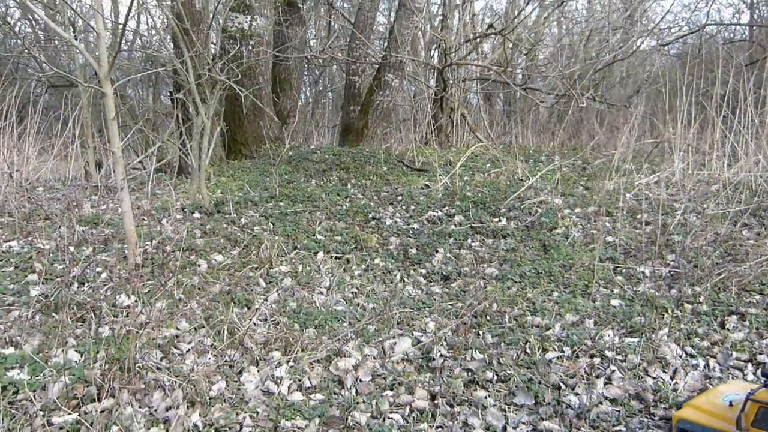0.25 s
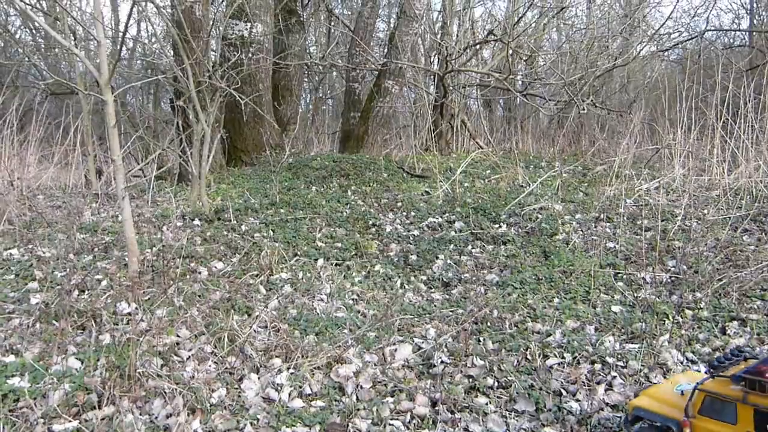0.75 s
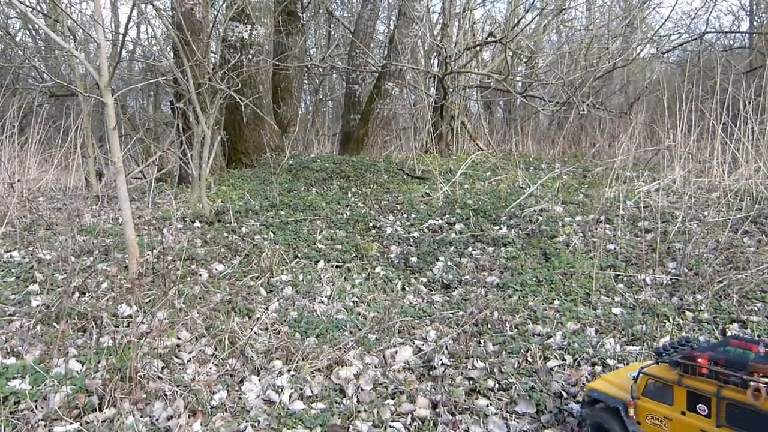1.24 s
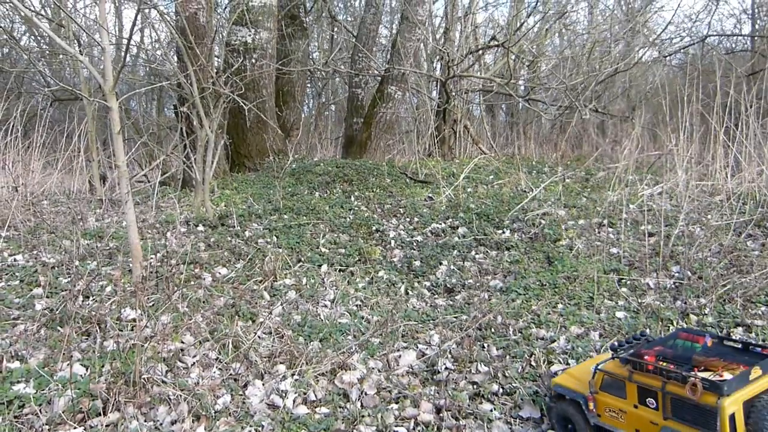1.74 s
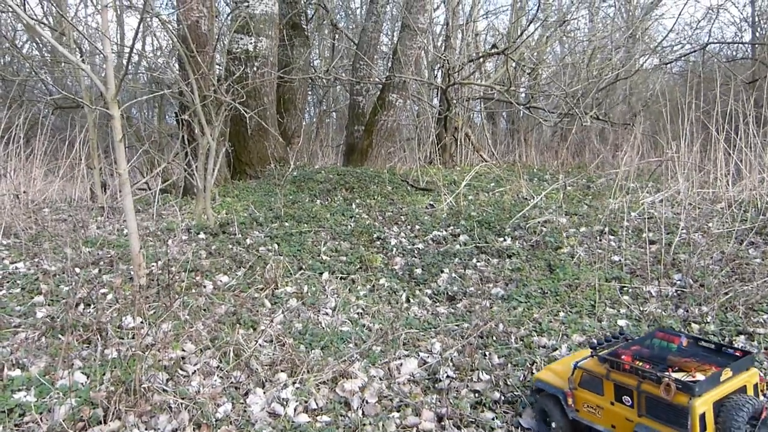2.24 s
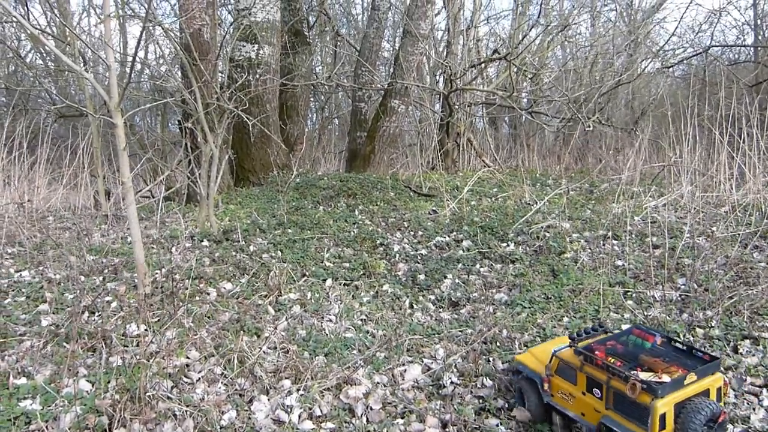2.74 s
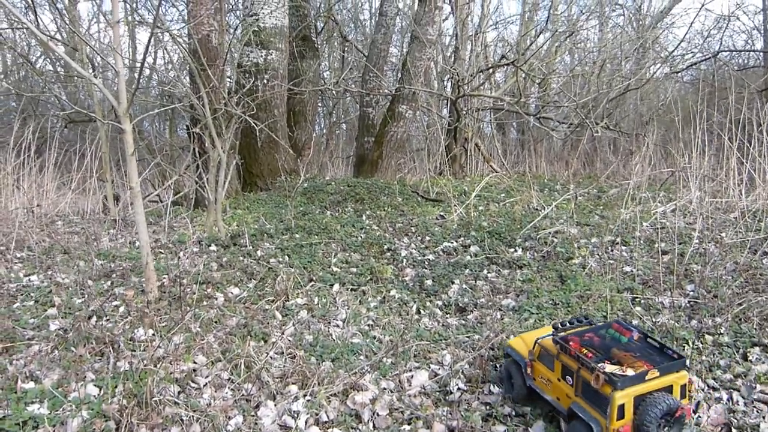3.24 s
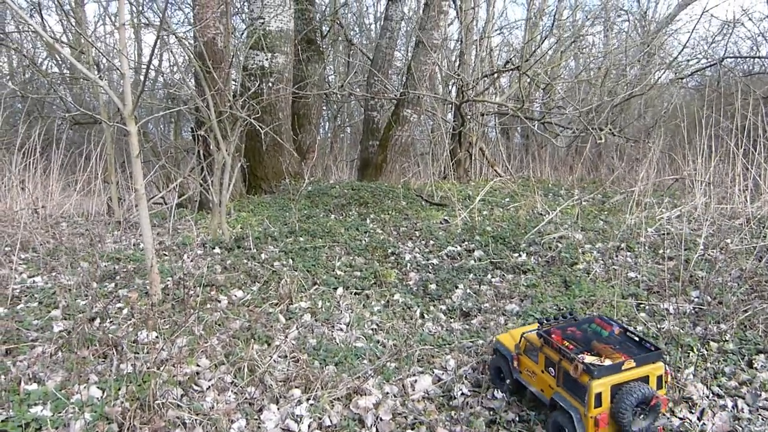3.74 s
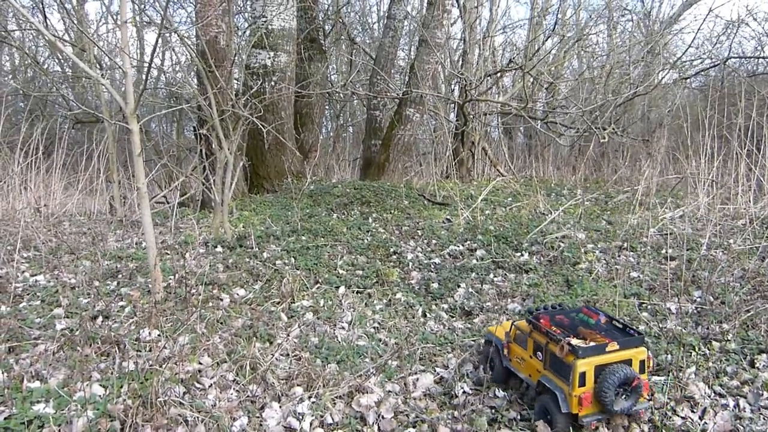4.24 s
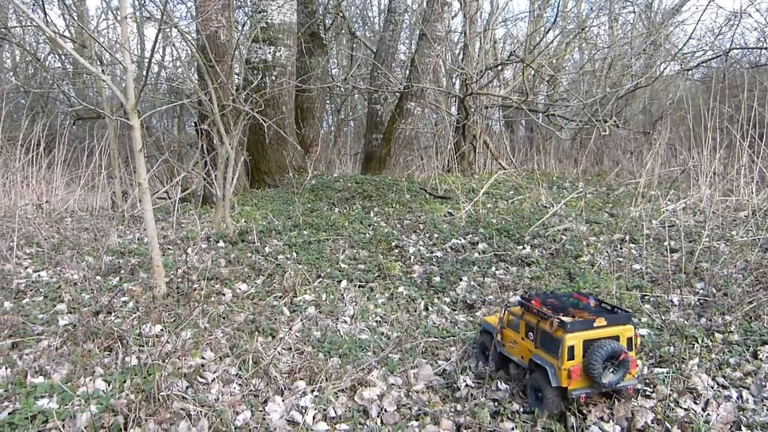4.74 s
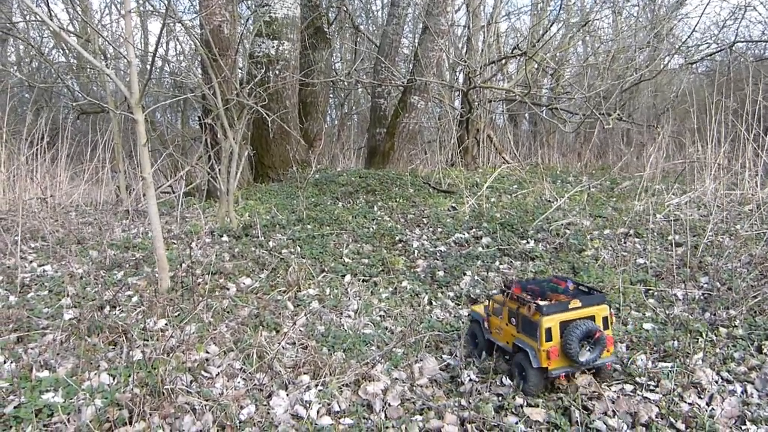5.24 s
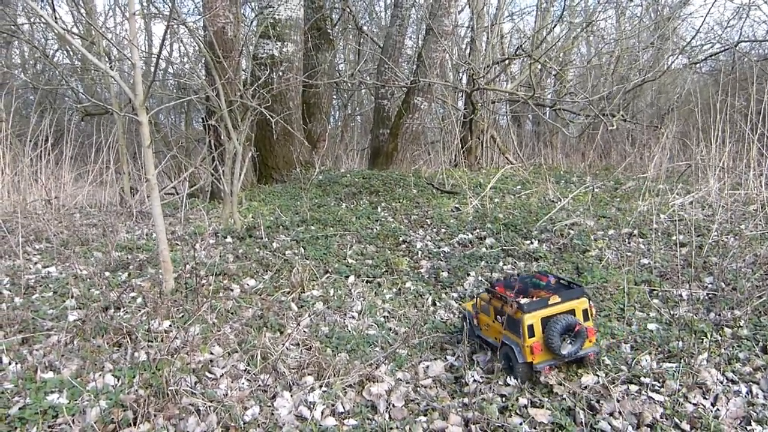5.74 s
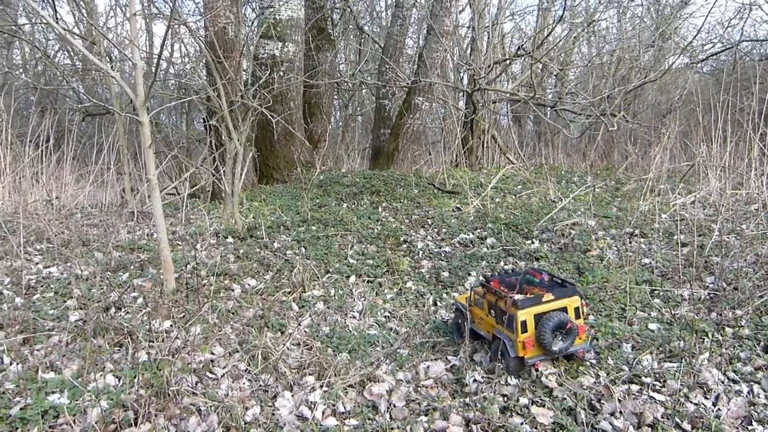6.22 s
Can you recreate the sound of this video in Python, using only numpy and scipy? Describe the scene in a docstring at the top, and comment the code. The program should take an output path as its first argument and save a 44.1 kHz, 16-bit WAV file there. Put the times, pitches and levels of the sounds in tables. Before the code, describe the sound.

From the start, the tyres of a small radio-controlled truck crush dry woodland leaves into a dense, bright crackle, dotted with sharp single snaps of leaves and twigs. Its plastic gears whirr softly and unevenly underneath, and the body shell gives two short hollow knocks in the first half second and another at about 3 seconds. A duller crunch of deeper litter swells in by 1 second and stays. The loudest twigs crack, with a woody ring, at around 3 seconds and again from 4 to 4.5 seconds. Wind touches the microphone lightly at first, then buffets it in low, thumping gusts from about 4.2 to 5.7 seconds before easing. The whirr gradually fades as the truck moves away, while the crackling carries on to the end at about 6.5 seconds. The sound is close and outdoors, with almost no echo.

```python
"""A small radio-controlled truck crawls away over dry woodland leaves, gears whirring, shell knocking.
From the start its tyres crush the litter into a dense crackle with single snaps of leaves and twigs;
a duller crunch swells by 1 s. The loudest twigs crack from 3 to 4.5 s. As the truck moves off, the
whirr fades and the ground reflection's notches climb through the crackle. Gusts, light at first,
buffet the microphone hardest from 4.2 to 5.7 s."""
import sys
import numpy as np
from scipy import signal
from scipy.fft import rfft, irfft
from scipy.io import wavfile
from scipy.ndimage import uniform_filter1d, map_coordinates

SR = 44100
rng = np.random.default_rng(int(sys.argv[2]) if len(sys.argv) > 2 else 0)


def dump_mix(stems):
    """Bounce the given channels to the path in sys.argv[1] as a 16-bit WAV at rate SR."""
    frames = np.atleast_2d(stems).T  # one column per channel
    limited = np.clip(frames, -1, 1)  # hard clip at full scale
    pcm = np.round(limited * 32767).astype(np.int16)
    wavfile.write(sys.argv[1], SR, pcm)


N = 285414
TIME = np.arange(N) / SR

# dry top leaves: freq_hz, gain_db
LEAF_SPECTRUM = [(300, -28), (1200, -18), (3900, -33), (4500, -4.5), (5300, -2.5), (6100, -1.5),
                 (6900, 4.5), (8000, 4.5), (9200, -1), (10500, -7), (12000, -8), (15500, -17.5)]
# deeper litter: freq_hz, gain_db
LITTER_SPECTRUM = [(100, -43), (600, -3.5), (1100, -8.5), (1700, -8), (2700, -1.5), (4000, 0.5), (4600, -7),
                   (7000, -12), (12000, -30)]

def tyres():
    """The tread folds leaves in clumps: bright crackle on top, dull crunch below, ticks of dry stalks."""
    crackle_db, crunch_db = crushing()
    clumps = flutter(rate_hz=81)
    top = fractures(1.98 * clumps, per_s=4500, spread_db=2.0, span_hz=(5200, 10700), width_hz=600,
                    direct=0.18, pan_spread=0.22)
    deep = fractures(2.05 * clumps, per_s=2800, spread_db=2.0, span_hz=(1397, 3970), width_hz=390,
                     direct=0.13, pan_spread=0.11)
    stalks = fractures(clumps, per_s=110, spread_db=2.2, span_hz=(1900, 9000), width_hz=500,
                       direct=0.25, pan_spread=0.3, modes=8)
    crackle = gain_of(crackle_db - 1.64) * steadied(colour(top, LEAF_SPECTRUM))
    crunch = gain_of(crunch_db - 1.0) * steadied(colour(deep, LITTER_SPECTRUM))
    ticks = unit_rms(colour(stalks, LEAF_SPECTRUM) + .5 * colour(stalks, LITTER_SPECTRUM))
    return crackle + crunch + gain_of(crackle_db - 9.5) * ticks


# steady rolling: time_s, crackle_db, crunch_offset_db
ROLLING = [(0, -35.5, -25), (.35, -37.5, -17), (.57, -40, -12), (1.08, -36, -2), (1.55, -35, -2),
           (2.35, -35.5, -4.5), (3.15, -35.5, -4.5), (3.85, -33, -4), (4.7, -36.5, -5.5),
           (4.97, -32.5, -3.5), (5.25, -34, -4), (6.2, -36, -4), (6.47, -35, 1)]
# leaf heaps under a tyre: start_s, length_s, crackle_db, crunch_offset_db
HEAPS = [(0.03, 0.19, -42.5, -7), (0.635, 0.071, -36.5, -6), (0.865, 0.086, -35.5, -5),
         (1.125, 0.33, -33.5, -5), (1.78, 0.13, -37.5, -5), (2.442, 0.2, -34, -2),
         (2.583, 0.27, -31.5, -4.5), (2.972, 0.12, -35, -3), (3.203, 0.14, -31, -4), (3.355, 0.29, -39, 2),
         (3.466, 0.18, -33, -3.5), (4.11, 0.045, -26, -4), (4.297, 0.13, -33, -3.5),
         (4.46, 0.14, -34.5, -2), (4.887, 0.2, -35.5, -3.5), (5.322, 0.23, -39, 0), (5.524, 0.036, -27, -6),
         (6.237, 0.071, -35.5, -6.5), (6.378, 0.13, -31, -3)]

def crushing(rise_s=0.012, settle_s=0.031):
    """Crackle and crunch envelopes in dB: each heap gives way, crackles under the tyre and settles."""
    rolling_db, offset_db = curves(ROLLING)
    power = gain_of([rolling_db, rolling_db + offset_db]) ** 2
    for start_s, length_s, heap_db, heap_offset_db in HEAPS:
        rise = np.clip((TIME - start_s) / rise_s, 0, 1)
        settle = np.exp(-np.maximum(TIME - start_s - length_s, 0) / settle_s)
        power += (gain_of([[heap_db], [heap_db + heap_offset_db]]) * rise * settle) ** 2
    return 10 * np.log10(power)


def fractures(clumps_db, per_s, spread_db, span_hz, width_hz, direct, pan_spread, modes=12):
    """Tiny breaks, mostly small, a few large; each lies left or right and rings one of many leaves."""
    strength = gain_of(spread_db * np.minimum(rng.exponential(1, N), 4) + clumps_db)
    clicks = strength * rng.choice([-1, 1], N) * (rng.random(N) < per_s / SR)
    pan = pan_spread * rng.standard_normal(N)
    clicks = clicks * np.array([1 + pan, 1 - pan])
    leaf = rng.integers(0, modes, N)
    pitches_hz = np.geomspace(*span_hz, modes)
    rings = sum(ring(clicks * (leaf == k), hz, width_hz) for k, hz in enumerate(pitches_hz))
    return rings + direct * clicks


# snapping leaves: start_s, crack_db, pitch_hz, decay_s
LEAF_SNAPS = [(0.1825, -18.5, 7900, 0.0033), (0.3966, -21.5, 8060, 0.0026), (0.44, -22.5, 6500, 0.002),
              (0.4575, -30, 6600, .0007), (0.5156, -20.5, 7200, 0.0008), (0.534, -23, 7600, .0005),
              (0.5604, -27, 6300, .0005), (0.5836, -22.5, 6400, 0.00045), (0.726, -24, 7200, .0005),
              (0.756, -19.5, 7350, 0.0057), (0.829, -20.5, 6350, 0.0055), (0.88, -27, 6800, .0015),
              (0.8977, -20, 5700, .001), (0.955, -24, 7300, 0.0016), (1.001, -21.5, 6750, 0.0011),
              (1.1664, -18, 5700, 0.00058), (1.2169, -16, 8700, 0.0033), (1.2237, -13, 6700, 0.00076),
              (1.2657, -18.5, 7900, 0.0024), (1.3, -21, 7900, .001), (1.4682, -16, 6840, 0.001),
              (1.5774, -19.5, 7000, 0.0069), (1.5886, -21, 6400, 0.00053), (1.8764, -27, 7500, .001),
              (1.928, -25.5, 7500, .0008), (2.0418, -20.5, 8300, 0.0024), (2.3353, -25.5, 8140, .0004),
              (2.4491, -19.5, 7160, 0.005), (2.4675, -29, 7500, .0005), (2.6806, -15.5, 8350, 0.0012),
              (2.7833, -13, 6740, 0.00087), (2.8228, -18.5, 5660, 0.002), (2.874, -17.5, 8200, 0.0012),
              (2.8866, -17, 7770, 0.0011), (2.9587, -21.5, 8750, 0.00049), (3.065, -18.5, 8700, 0.00073),
              (3.105, -17.5, 7600, 0.0022), (3.1144, -14.5, 8650, 0.00052), (3.219, -22, 8000, .002),
              (3.2499, -17, 7140, 0.00082), (3.2786, -15, 7800, 0.00051), (3.6363, -17.5, 7200, 0.00092),
              (3.9497, -16.5, 5950, 0.0009), (4.149, -19, 8500, .0025), (4.3306, -19, 9200, .0006),
              (4.3936, -18, 7950, .0005), (4.468, -16.5, 7300, 0.0016), (4.5018, -19, 7900, .0006),
              (4.562, -18, 7140, 0.00027), (4.7286, -25, 8000, .0005), (4.8933, -21.5, 8200, .0006),
              (5.0675, -17.5, 5900, 0.00065), (5.131, -19, 8000, .0004), (5.1598, -19, 8000, .0005),
              (5.4802, -20.5, 8400, 0.0058), (5.839, -19, 7140, 0.0021), (5.9854, -23.5, 8900, .0008)]

def leaves():
    """Dry leaves crack brightly; louder or longer breaks knock harder on the litter below."""
    out = np.zeros(N)
    for start_s, crack_db, pitch_hz, decay_s in LEAF_SNAPS:
        weight_db = 2.3 * (crack_db + 17) + 6.5 * np.log2(decay_s / .001)  # zero at -17 dB, 1 ms
        knock_db = crack_db - 15.5 + weight_db
        add(out, start_s, snap(crack_db, knock_db, pitch_hz, decay_s, ringing=1.5, width_hz=570))
    return out


# cracking twigs: start_s, knock_db, crack_db, pitch_hz, decay_s
TWIG_CRACKS = [(0.3446, -26.5, -24, 2430, 0.0012), (0.3595, -26.5, -26, 1650, 0.0011),
               (0.7124, -23.5, -21, 3000, 0.0011), (1.042, -22.5, -35, 2820, 0.00051),
               (1.154, -22, -30, 1970, 0.00092), (1.172, -21, -19, 1590, 0.0013),
               (1.3955, -21.5, -26, 2840, 0.004), (1.711, -28, -35, 2670, .001),
               (1.954, -23.5, -24, 2290, 0.0014), (2.181, -23.5, -22.5, 3600, 0.0024),
               (2.7842, -18, -20, 4840, 0.0019), (2.9959, -10.5, -21, 3100, 0.0016),
               (3.115, -16.5, -13, 1780, 0.0019), (3.2372, -19, -35, 3300, 0.0028),
               (4.101, -17, -17, 3020, 0.0019), (4.2198, -13.5, -14, 3600, 0.0027),
               (4.5223, -13.5, -17, 2480, 0.0022), (4.5281, -14.5, -12, 2550, .0038)]

def twigs():
    """Twigs break with a ringing, woody knock and bright splintering."""
    out = np.zeros(N)
    for start_s, knock_db, crack_db, pitch_hz, decay_s in TWIG_CRACKS:
        add(out, start_s, snap(crack_db, knock_db, pitch_hz, decay_s, ringing=4.2, width_hz=680))
    return out


def snap(crack_db, knock_db, pitch_hz, decay_s, ringing, width_hz, size=1024):
    """A first crack, then a run of smaller ones that swells and dies, ringing the leaf or twig."""
    age = np.arange(size) / SR / decay_s
    tear = rng.standard_normal(size) * (1 - np.exp(-age / .18)) * np.exp(-age)
    tear[0] += 3.2  # first crack
    tear += ringing * ring(tear, pitch_hz, width_hz)
    crack = butterworth(colour(tear, LEAF_SPECTRUM), 2, [4900, 11000], "band")
    knock = butterworth(colour(tear, LITTER_SPECTRUM), 2, [1150, 4100], "band")
    return burst(crack, crack_db) + burst(knock, knock_db)


# receding truck: time_s, first_notch_hz, whirr_db
ROUTE = [(0, 2920, -40), (.8, 3320, -41.5), (1.5, 3400, -42.5), (2.5, 4200, -42.5), (3.5, 4360, -44),
         (4.5, 5200, -45.5), (5.5, 4660, -47.5), (6.47, 5100, -49.5)]
# gear whirr: freq_hz, gain_db
GEAR_SPECTRUM = [(45, -35), (110, -15), (200, -3), (310, -4), (480, -0.5), (720, 0.5), (1050, -3),
                 (2000, -1.5), (5000, -8), (15000, -26)]

def gears(rough_db=1.5, hiss_hz=4100, width_hz=220, hiss_db=-14.0):
    """Plastic gears and shafts whirr softly, unevenly. A faint, narrow hiss band fades with the whirr."""
    _, whirr_db = curves(ROUTE)
    noise = rng.standard_normal(N) * gain_of(rough_db * flutter(rate_hz=96))
    whirr = unit_rms(colour(noise, GEAR_SPECTRUM))
    hiss = unit_rms(ring(ring(noise, hiss_hz, width_hz), hiss_hz, width_hz))
    return gain_of(whirr_db) * (whirr + gain_of(hiss_db) * hiss)


# jolts over bumps: start_s, level_db, pitch_hz
SHELL_KNOCKS = [(0.187, -29, 726), (0.281, -29.5, 640), (3.017, -29, 850)]

def shell(width_hz=260, decay_s=0.0018, size=2048):
    """Each jolt rattles the plastic body shell: a short, hollow knock."""
    out, t = np.zeros(N), np.arange(size) / SR
    for start_s, level_db, pitch_hz in SHELL_KNOCKS:
        rattle = rng.standard_normal(size) * np.exp(-t / decay_s)
        add(out, start_s, burst(ring(rattle, pitch_hz, width_hz), level_db))
    return out


# eddies at the microphone: freq_hz, gain_db
WIND_SPECTRUM = [(25, -30), (50, -25), (90, -10), (140, -1.5), (220, -1), (320, -3.5), (500, -3.5),
                 (680, -9.5), (1000, -20), (1500, -33), (4000, -52)]

def wind(lumpy_db=4, trim_db=-17, bright_db_per_db=0.7):
    """Eddies push the two microphone ports mostly in opposite directions; harder gusts are brighter."""
    force_db = gusts() + 21  # near 0 in the strongest gusts
    lumps = gain_of(lumpy_db * np.tanh(flutter(rate_hz=41) / 2))
    eddies = colour(lumps * rng.standard_normal((2, N)), WIND_SPECTRUM)
    lows = butterworth(eddies, 1, 350, "low")
    opposed, common = lows + gain_of(bright_db_per_db * force_db) * (eddies - lows)
    buffet = gain_of(force_db) * steadied(butterworth(opposed, 2, 90, "high"))
    # the deepest part reaches both ports alike
    deep = butterworth(common, 1, 55, "low") + 0.74 * gain_of(force_db / 2) * common
    thump = gain_of(0.73 * force_db - 21) * steadied(deep)
    return gain_of(trim_db) * np.array([thump + buffet, thump - buffet])


# gusts: peak_s, length_s, force_db
GUSTS = [(0.536, 0.09, -37.5), (0.832, 0.11, -36), (1.318, 0.26, -38.5), (1.537, 0.033, -34),
         (1.65, 0.15, -37), (1.995, 0.14, -37), (2.103, 0.067, -35.5), (2.562, 0.091, -42),
         (3.108, 0.2, -41.5), (4.245, 0.046, -26.5), (4.665, 0.072, -18), (4.777, 0.089, -21.5),
         (4.93, 0.43, -21), (5.097, 0.025, -24.5), (5.228, 0.12, -28.5), (5.419, .025, -26),
         (5.538, 0.16, -20.5), (6.024, 0.11, -31), (6.27, 0.075, -33.5), (6.463, 0.049, -28.5)]
# breeze between gusts: time_s, force_db
BREEZE = [(0, -89), (.65, -47.5), (1.45, -56), (2.3, -61), (3.85, -65), (4.25, -36), (5.4, -35),
          (6.47, -47.5)]

def gusts():
    """Wind force in dB: each gust swells and dies as a bell curve on top of the breeze."""
    power = gain_of(curves(BREEZE)[0]) ** 2
    for peak_s, length_s, force_db in GUSTS:
        from_peak = np.minimum(abs(2 * (TIME - peak_s) / length_s), 10)
        power += gain_of(force_db) ** 2 * np.exp(-2 * from_peak ** 2)
    return 10 * np.log10(power)


def ground(x, echo=0.28, band_hz=5400, width_hz=1300, near_db=4.5, sink_db=-7):
    """The bounce lags less as the truck moves off, so its notches climb; the lower treble sinks."""
    first_notch_hz, _ = curves(ROUTE)
    lag_samples = SR / (2 * first_notch_hz)
    bounce = map_coordinates(x, [np.arange(N) - lag_samples], order=3)
    x = (x + echo * bounce) / np.sqrt(1 + echo ** 2)
    bell = np.exp(-(2 * (np.fft.rfftfreq(N, 1 / SR) - band_hz) / width_hz) ** 2)
    band = irfft(rfft(x) * bell, N)
    band_db = near_db + sink_db * (TIME / TIME[-1]) ** 2
    return x + (gain_of(band_db) - 1) * band


def woodland(pair, level_db=-11.0, t60_s=0.074, size=12000):
    """Quick scatter from litter and trunks; the paths change as the truck moves."""
    out, t = np.zeros((2, N)), np.arange(size) / SR
    fade = gain_of(level_db) * unit_rms(gain_of(-60 * t / t60_s)) * (t > .001) / np.sqrt(size)
    hop = N // 12
    for start in range(-hop, N, hop):
        at = np.arange(max(start, 0), min(start + 2 * hop, N))
        stretch = pair[:, at] * np.sin(np.pi * (at - start) / (2 * hop))
        paths = fade * rng.standard_normal((2, size))
        for side, scatter in zip(out, signal.fftconvolve(stretch, paths, axes=1)):
            add(side, at[0] / SR, scatter)
    return out


# microphone ports: freq_hz, left_over_right_db, left_lead_rad
PORTS = [(1010, -1.3, 0.9), (2110, 1.7, -0.63), (3100, -1, -0.58), (4200, 5, -1.03), (5430, 1, 1.38),
         (6500, 2, 1), (7000, -2.5, 0.68), (8700, 6.5, 1.07), (9500, 6, -1), (11300, 1.5, 1.58)]

def ports(pair):
    """The camera body shades and delays the two ports differently at each frequency."""
    balance_db, lead_rad = spectra(PORTS, np.fft.rfftfreq(N, 1 / SR))
    half = gain_of(balance_db / 2) * np.exp(.5j * lead_rad)
    return irfft(rfft(pair) * np.array([half, 1 / half]), N)


def gain_of(db):
    """Decibels to amplitude."""
    return 10 ** (np.asarray(db) / 20)


def unit_rms(x):
    """Scales to rms 1."""
    return x / np.sqrt(np.mean(x ** 2) + 1e-20)


def burst(x, level_db):
    """Scales to the energy of 1 ms at the given rms level."""
    return gain_of(level_db) * unit_rms(x) * np.sqrt(SR / 1000 / len(x))


def steadied(x, size=4410):
    """Removes a texture's slow swell, keeps its grain."""
    power = uniform_filter1d(uniform_filter1d(x ** 2, size), size // 2)
    return x / np.sqrt(abs(power) + 1e-12)


def curves(rows):
    """Table columns over time."""
    time_s, *columns = np.transpose(rows)
    return [np.interp(TIME, time_s, column) for column in columns]


def spectra(rows, hz):
    """Table columns over log frequency."""
    freq_hz, *columns = np.transpose(rows)
    return [np.interp(np.log(hz + 1), np.log(freq_hz + 1), column) for column in columns]


def add(mix, start_s, sound):
    """Mixes a sound in at start_s."""
    part = mix[max(round(start_s * SR), 0):][:len(sound)]
    part += sound[:len(part)]


def colour(x, spectrum, size=2048):
    """Minimum-phase filter: clicks keep their sharp fronts."""
    gain_db, = spectra(spectrum, abs(np.fft.fftfreq(size, 1 / SR)))
    response = np.exp(np.conj(signal.hilbert(np.log(gain_of(gain_db)))))
    taps = np.fft.ifft(response).real[:size // 2]
    return signal.oaconvolve(x, np.array(taps, ndmin=x.ndim), axes=-1)[..., :x.shape[-1]]


def butterworth(x, order, edge_hz, kind):
    """Causal low-, high- or band-pass."""
    return signal.lfilter(*signal.butter(order, edge_hz, kind, fs=SR), x)


def ring(x, hz, width_hz):
    """One resonance of gain 1."""
    return signal.lfilter(*signal.iirpeak(hz, hz / width_hz, SR), x)


def flutter(rate_hz):
    """Smooth noise of rms 1, up to about rate_hz."""
    hz = np.fft.rfftfreq(N, 1 / SR)
    return unit_rms(irfft(rfft(rng.standard_normal(N)) / (1 + (hz / rate_hz) ** 2), N))


def scene(overload=0.95):
    """Truck and leaves in the wood, plus wind that gently overloads the microphone."""
    sources = tyres() + gears() + leaves() + twigs() + shell()
    truck = np.array([ground(side) for side in sources])
    return ports(truck + woodland(truck)) + overload * np.tanh(wind() / overload)


def record(dry, edge_hz=15900):
    """Steep low-pass band limit."""
    taps = signal.firwin(511, edge_hz, window=("kaiser", 9), fs=SR)
    return signal.oaconvolve(dry, taps[None], "same")


dry = scene()
out = record(dry)
dump_mix(out)
```